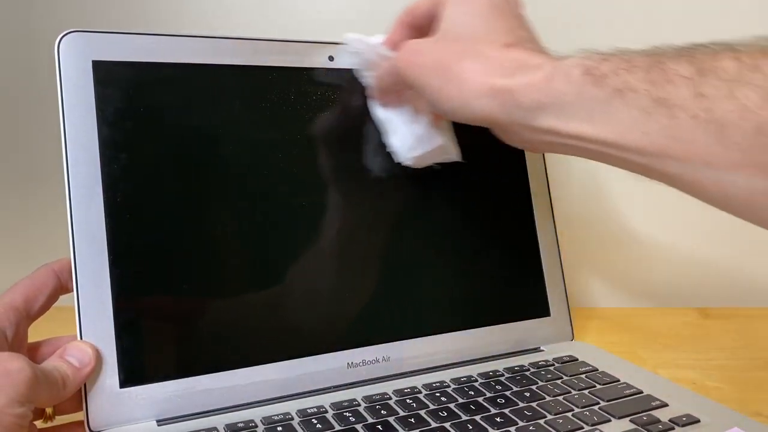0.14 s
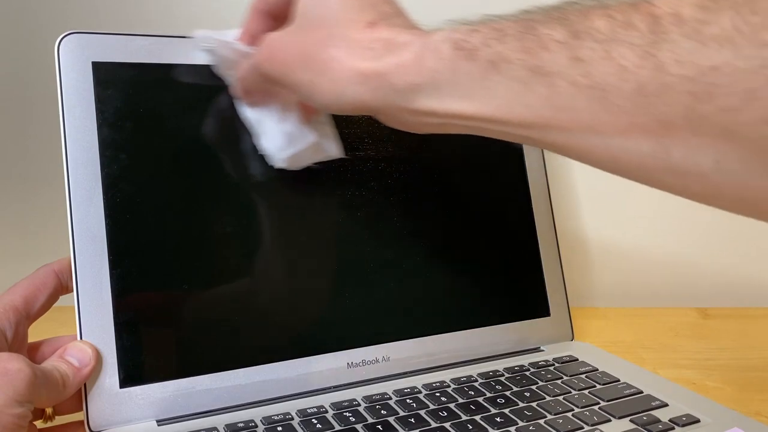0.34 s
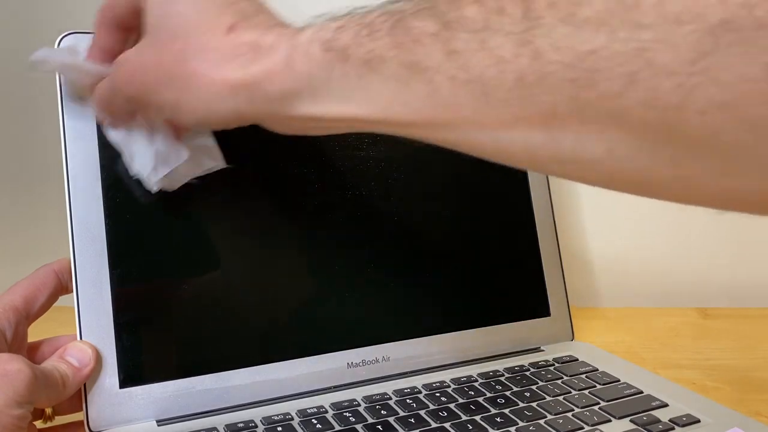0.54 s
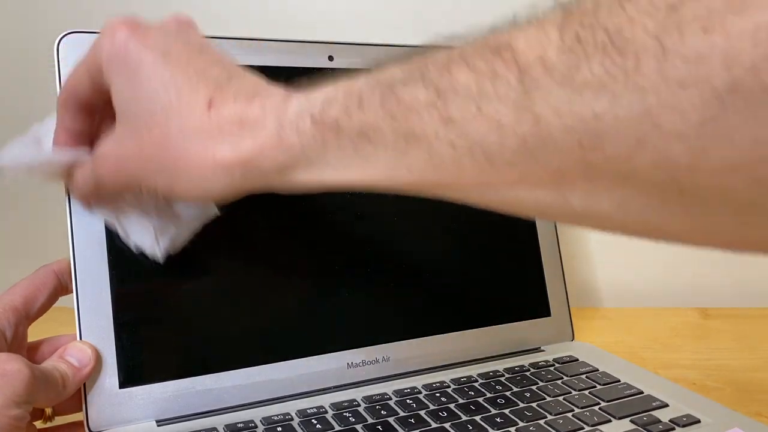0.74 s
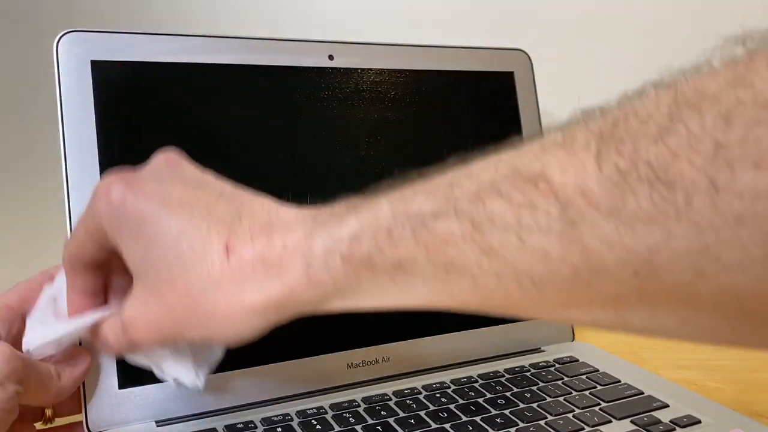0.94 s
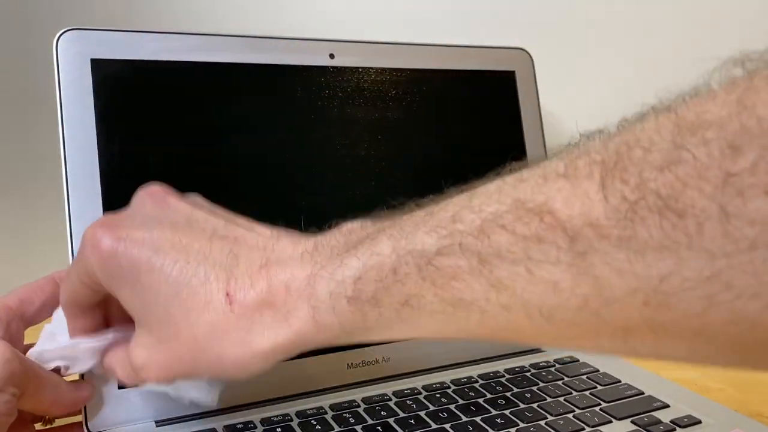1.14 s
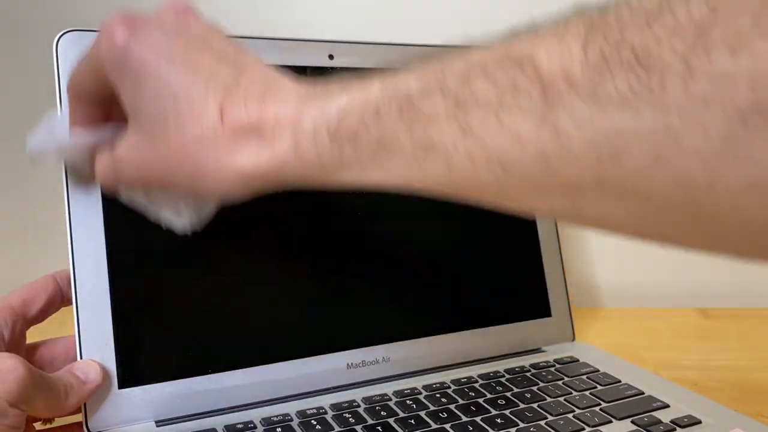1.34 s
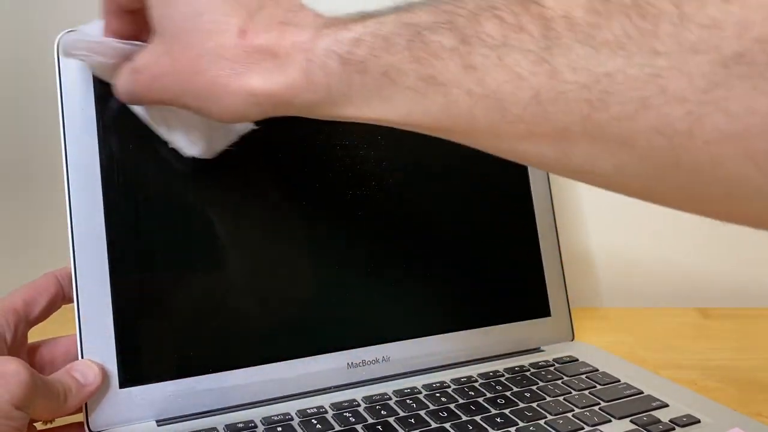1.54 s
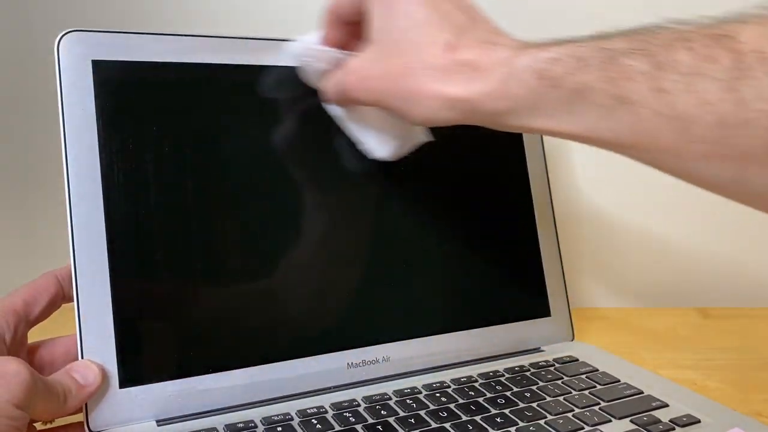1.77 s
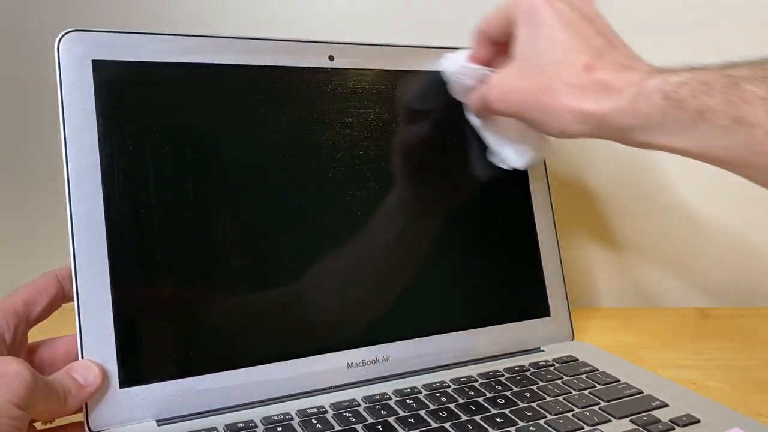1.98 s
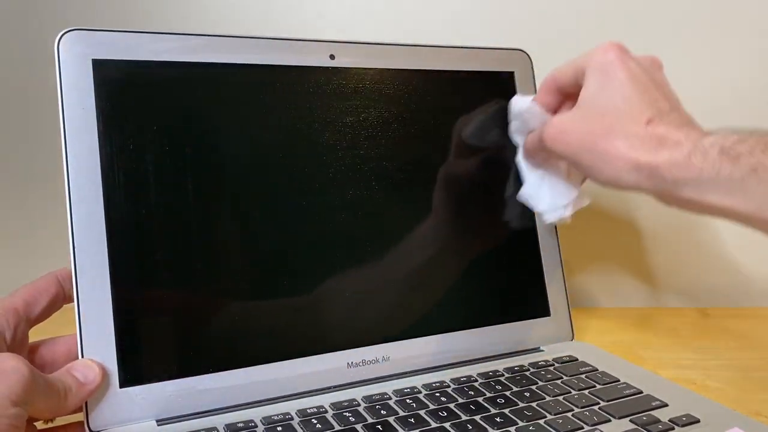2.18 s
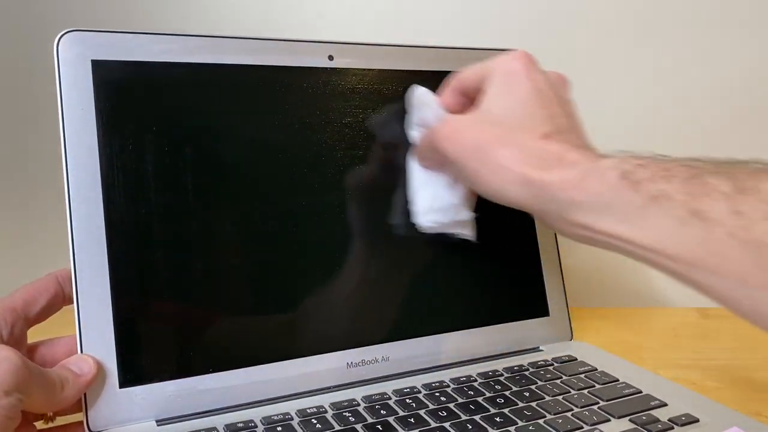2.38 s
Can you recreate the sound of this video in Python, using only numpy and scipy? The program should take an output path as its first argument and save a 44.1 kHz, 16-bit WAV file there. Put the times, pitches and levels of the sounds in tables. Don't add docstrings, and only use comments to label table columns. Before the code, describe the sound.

Close, faint wiping of a glass screen with a wet cloth, fizzy strokes and dull bumps

```python
import sys
import numpy as np
from scipy import signal
from scipy.fft import rfft, irfft, next_fast_len
from scipy.io import wavfile
from scipy.ndimage import uniform_filter1d, map_coordinates

SR = 44100
rng = np.random.default_rng(int(sys.argv[2]) if len(sys.argv) > 2 else 0)


def digitize_waveform(pressure):
    field = np.atleast_2d(pressure).T
    bounded = np.clip(field, -1, 1)
    quanta = np.round(bounded * 32767).astype(np.int16)
    wavfile.write(sys.argv[1], SR, quanta)


def boost(x):
    u = np.asarray(x, float) / 20
    return 10 ** u


N = 108045

# (frequency [Hz], likeness [0-1])
ROOM_ALIKE = [(60, 0.94), (200, 0.74), (700, 0.24), (2000, 0.14), (7000, .4), (9000, 0.76), (13000, .98)]


def unit(x):
    return x / np.sqrt(np.mean(x ** 2) + 1e-20)


def along(points, hz):
    f, v = np.transpose(points)
    return np.interp(np.log(hz + 1), np.log(f + 1), v)


def wobble(rate):
    knots = rng.standard_normal(int(N * rate / SR) + 4)
    return map_coordinates(knots, [np.arange(N) * rate / SR])


def filtered(x, response):
    m = next_fast_len(N + 8192)
    hz = np.fft.rfftfreq(m, 1 / SR)
    return irfft(rfft(x, m) * response(hz), m)[..., :N]


def spread(pair, alike):
    def mid_side(hz):
        turn = np.arccos(np.clip(along(alike, hz), -1, 1)) / 2
        return np.array([np.cos(turn), np.sin(turn)])

    mid, side = filtered(pair, mid_side)
    return np.array([mid + side, mid - side])


def shaped(x, gain, patchy_db):
    hz, t, z = signal.stft(x, SR, nperseg=512)
    field = rng.standard_normal(z.shape[1:])
    field = uniform_filter1d(field, size=7, axis=0)
    field = uniform_filter1d(field, size=10, axis=1)
    z = z * gain(hz[:, None], t) * boost(patchy_db * unit(field))
    return signal.istft(z, nperseg=512)[1][:, :N]


def fibres(spiky_db):
    return unit(rng.standard_normal((2, N)) * boost(spiky_db * wobble(900)))


def hollow(centre_hz, q):
    def gain(hz, t):
        centre = centre_hz(t)
        u = hz / centre + 1e-6
        peak = 1 / (1 + (q * (u - 1 / u)) ** 2)
        skirt = boost(-24) * np.sqrt(peak)
        return (peak + skirt) / np.sqrt(centre)

    return unit(shaped(fibres(1.5), gain, patchy_db=1.3))


def cloth():
    # (frequency [Hz], density [dB per Hz])
    fizz_colour = [(900, -66), (2500, -19.5), (5000, -5), (6600, -7.5), (8400, -3), (9600, -2), (12400, -5),
                   (15900, -11.5)]
    # (frequency [Hz], likeness [0-1])
    rub_alike = [(700, .6), (2500, .5), (5000, .88), (7800, .3), (8400, .88), (11000, .97), (13000, .99),
                 (14000, .99), (15000, .9)]
    # (time [s], grumble level [dB])
    press = [(0, -81), (.15, -68), (.4, -78.5), (.9, -76.5), (1.0, -74), (1.05, -92), (1.95, -84.5),
             (2.08, -64.5), (2.17, -77), (2.25, -90)]
    # (time [s], cloth speed as fizz level [dB], hollow over fizz [dB],
    # hollow pitch [Hz], dull drag over fizz [dB])
    across = [(0, -68, 3, 3100, -5), (.05, -61.5, -1, 3350, -13), (.12, -62, 1.5, 3030, -6.5),
              (.27, -62.5, -3, 3560, -5.5), (.34, -61.5, -1, 3180, -3), (.39, -63.5, -1, 3220, -11.5),
              (.48, -70.5, -2.5, 3400, -16), (0.567, -72, 0, 2920, -2)]
    down = [(0.591, -63.5, 3.5, 3080, -3), (.68, -60.5, 3, 4170, -3.5), (.76, -57.5, 3, 4400, -7),
            (.84, -58, 3, 4850, -7.5), (.9, -60, 1, 5200, -4), (.94, -63.5, -12, 4550, -6.5),
            (1.0, -63, -4.5, 3000, -3.5), (1.02, -71.5, -1.5, 2840, 2), (1.035, -99, 0, 2820, -4)]
    up = [(1.12, -88.5, 6, 3280, -8), (1.158, -67, -4, 3700, -6), (1.22, -58, -3.5, 5000, -20),
          (1.29, -59.5, -10, 4570, -36), (1.39, -64.5, -11, 3960, -27), (1.44, -70.5, -1, 3300, -10),
          (1.49, -88, -4, 3300, -21)]
    back = [(1.59, -79.5, 1, 3300, -23), (1.64, -64, -12, 3700, -18), (1.715, -62, -5.5, 3400, -12),
            (1.755, -68, -6.5, 3650, -21), (1.89, -73.5, -3, 3600, -12), (1.97, -90, 0, 3500, -15)]
    dab = [(2.0, -92, 15, 2860, 6), (2.05, -84.5, 17.5, 3770, 10), (2.1, -73.5, 10.5, 4180, 2.5),
           (2.129, -74.5, 4.5, 4370, -3), (2.16, -65.5, -2, 4470, -12), (2.2, -68, -2.5, 4440, -19),
           (2.225, -80, 8.5, 4450, -3), (2.26, -99, -17, 4160, -2)]
    s, speed_db, cup_db, cup_hz, drag_db = np.transpose(across + down + up + back + dab)
    t = np.arange(N) / SR
    speed = boost(np.interp(t, s, speed_db) + 0.3 * wobble(13.67))

    fizz = unit(shaped(fibres(0.66), lambda hz, t: boost(along(fizz_colour, hz)), patchy_db=3.0))
    fizz = boost(5 + 0.58 * wobble(30.3)) * fizz

    def pitch(share):
        return lambda t: share * np.interp(t, s, cup_hz)

    cup = hollow(pitch(0.96), q=2.6) + boost(-9.5) * hollow(pitch(1.52), q=2.6)
    cup = boost(-1.5 + np.interp(t, s, cup_db)) * cup
    drag = boost(1 + np.interp(t, s, drag_db)) * hollow(pitch(2420 / 4000), q=1.15)

    grumble = unit(filtered(fibres(2.7), lambda hz: hz / 650 / (1 + (hz / 650) ** 4)))
    grumble = boost(0.5 + np.interp(t, *np.transpose(press))) * grumble
    return spread(speed * (fizz + cup + drag) + grumble, rub_alike)


def lid():
    # (time [s], pitch [Hz], hold [s], peak level [dB])
    flexes = [(0.197, 61.7, .051, -47.5), (0.366, 112.6, 0.015, -42.5), (0.379, 67.5, 0.026, -41),
              (0.566, 78, 0.02, -37), (0.59, 126, 0.02, -36.5), (.611, 88.2, 0.05, -32),
              (.612, 131, 0.0218, -39), (0.671, 65, 0.1, -42.5), (.811, 103, 0.012, -39.5),
              (.819, 80.3, 0.053, -36.5), (0.908, 62, 0.066, -44), (.986, 84, 0.034, -41.5),
              (1.01, 79, .046, -39), (1.243, 84, 0.011, -46), (1.274, 62.4, 0.026, -45.5),
              (1.453, 67.6, 0.036, -45.5), (1.48, 57.5, .04, -56.5), (2.077, 71.6, 0.0099, -48.5),
              (2.093, 81.5, .023, -43.5), (2.103, 132.3, 0.039, -41.5), (2.132, 53, 0.024, -40.5),
              (2.149, 122, .02, -43.5), (2.172, 56, 0.03, -48)]
    attack_s, release_s, fade_per_s = .004, .0035, 17.4
    sag_per_s, sharp, settle_s = 4, 0.62, 0.0059
    boom, shake = np.zeros(N + SR), np.zeros(N + SR)
    t = np.arange(SR // 5) / SR

    cycles = (1 - np.exp(-sag_per_s * t)) / sag_per_s
    cycles = cycles + sharp * settle_s * (1 - np.exp(-t / settle_s))
    for s, hz, hold, db in flexes:
        rise = 1 - np.exp(-t / attack_s)
        fall = np.exp(-np.maximum(t - hold, 0) / release_s - fade_per_s * t)
        shape = boost(db) * rise * fall
        turn = 2 * np.pi * hz * cycles
        start = round(s * SR)
        boom[start:][:len(t)] += shape * (np.sin(turn) + boost(-28) * np.sin(2 * turn))
        shake[start:][:len(t)] += shape

    tick_s, tick_db, tick_hz, tick_fall_s = .8065, -53, 1200, .005
    fall = np.exp(-t / tick_fall_s)
    turn = 2 * np.pi * (tick_hz * tick_fall_s * (1 - fall) + 150 * t)
    tick = boost(tick_db) * np.sqrt(fall) * (1 - fall ** 4) * np.sin(turn)
    boom[round(tick_s * SR):][:len(t)] += tick

    rattle = unit(filtered(rng.standard_normal((2, N)), lambda hz: hz / 250 / (1 + (hz / 250) ** 2.57)))
    rattle = boost(-28) * uniform_filter1d(shake[:N], size=900) * spread(rattle, ROOM_ALIKE)
    return np.array([np.roll(boom, -7)[:N], np.roll(boom, 7)[:N]]) + rattle


def room():
    # (frequency [Hz], density [dB per Hz])
    hiss_colour = [(12, -18), (20, -4), (84, -4), (511, -18), (774, -25), (5380, -36.5), (11400, -42),
                   (13800, -40), (15000, -85)]
    hiss_db, hiss_top_hz = -62.5, 12800
    rumble_db, rumble_hz, rumble_wide_hz = -60.5, 62, 32.4

    def hiss_gain(hz, t):
        return boost(along(hiss_colour, hz)) / (1 + (hz / hiss_top_hz) ** 30)

    def rumble_gain(hz):
        return 1 / (1 + ((hz - rumble_hz) / rumble_wide_hz) ** 2) * hz / (hz + 30)

    hiss = unit(shaped(rng.standard_normal((2, N)), hiss_gain, patchy_db=.6))
    rumble = unit(filtered(rng.standard_normal((2, N)), rumble_gain)) * boost(1.15 * wobble(6.04))
    return spread(boost(hiss_db) * hiss + boost(rumble_db) * rumble, ROOM_ALIKE)


def scene():
    return cloth() + lid() + room()


def low_pass(x):
    return signal.sosfilt(signal.butter(12, 16030, fs=SR, output="sos"), x)


def record(dry):
    # (frequency [Hz], lead [radians])
    lead = [(0, 0), (3400, 1.1), (5500, .5), (6300, 0), (8000, -3.2), (11000, -6.35), (12800, -8.55),
            (14000, -10.3), (15800, -12.5)]
    # (frequency [Hz], level [dB])
    louder = [(100, -1.8), (700, 1), (3000, 3.5), (6500, 5.5), (8300, 0), (15000, 0)]
    sides = np.array([[.5], [-.5]])

    def port(hz):
        level = boost(sides * along(louder, hz))
        phase = sides * np.interp(hz, *np.transpose(lead))
        return level * np.exp(1j * phase) * (hz < 15780)

    return low_pass(filtered(dry, port))


dry = scene()
out = record(dry)
digitize_waveform(out)
```